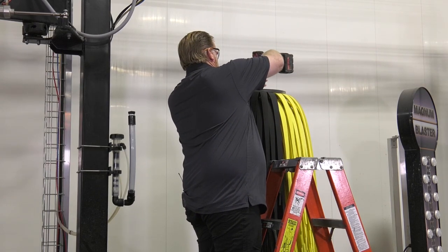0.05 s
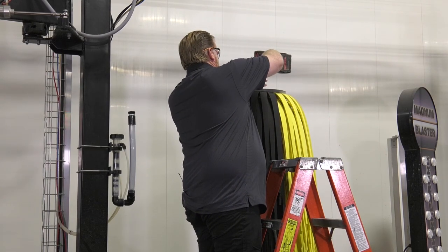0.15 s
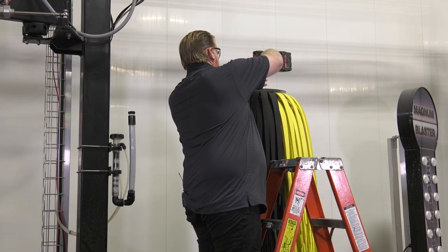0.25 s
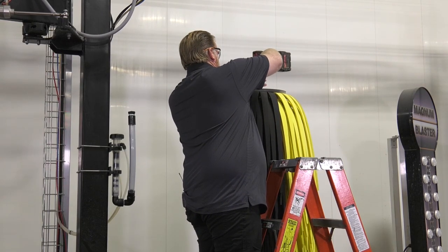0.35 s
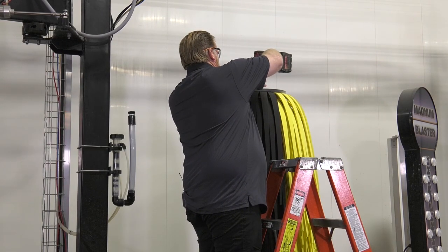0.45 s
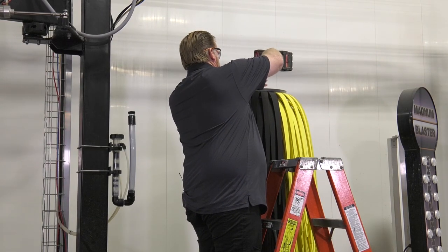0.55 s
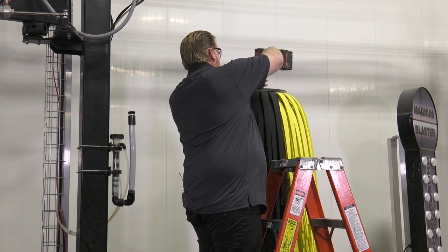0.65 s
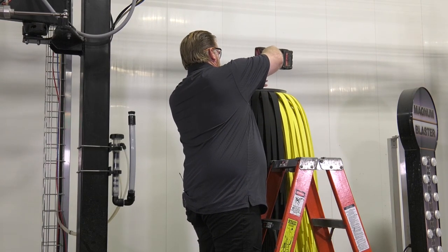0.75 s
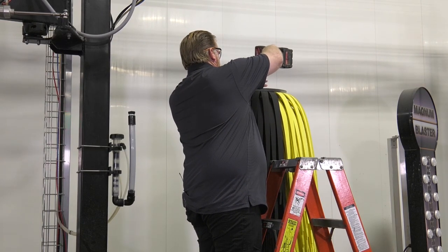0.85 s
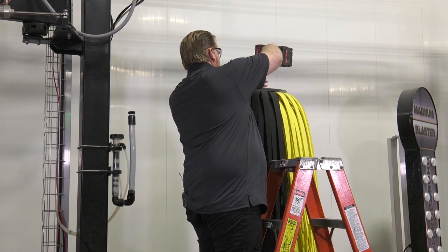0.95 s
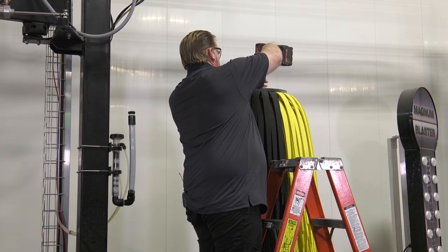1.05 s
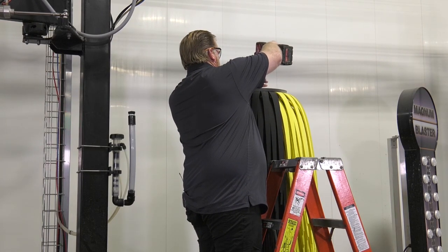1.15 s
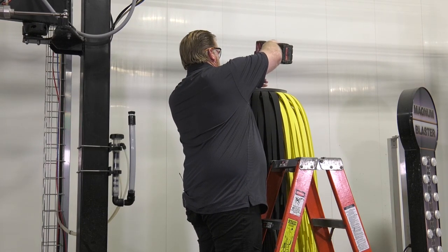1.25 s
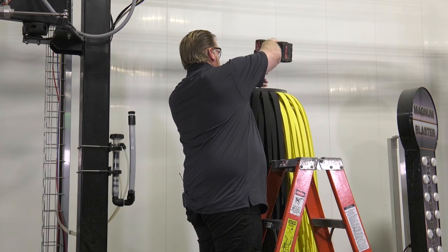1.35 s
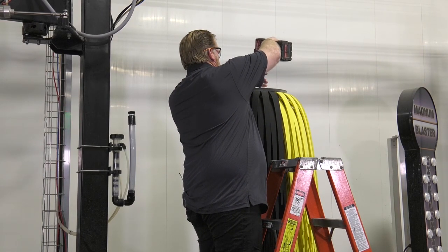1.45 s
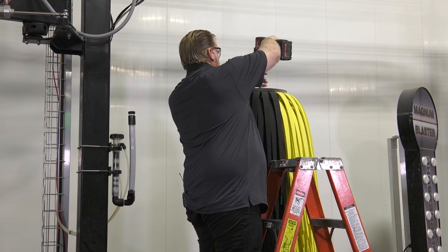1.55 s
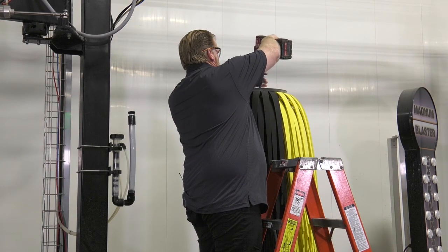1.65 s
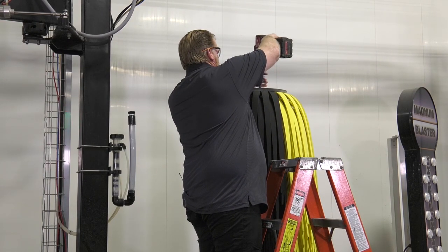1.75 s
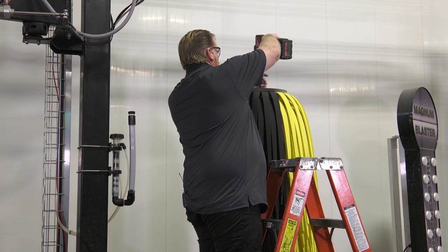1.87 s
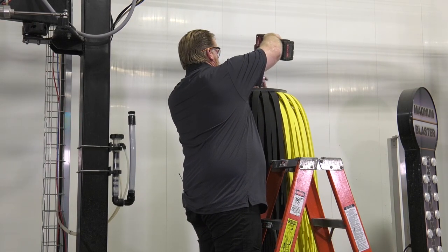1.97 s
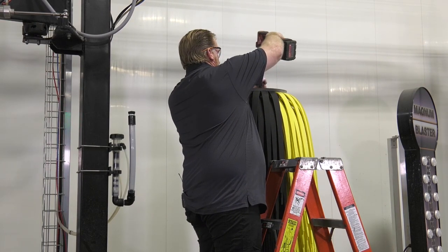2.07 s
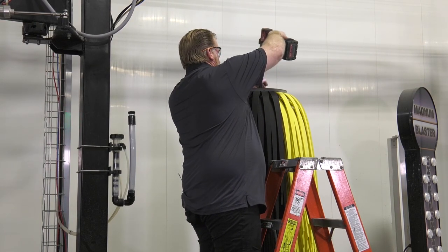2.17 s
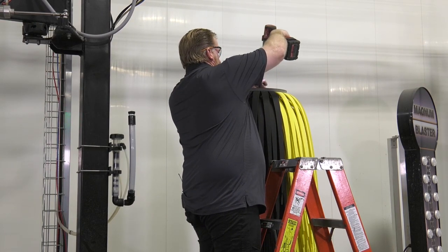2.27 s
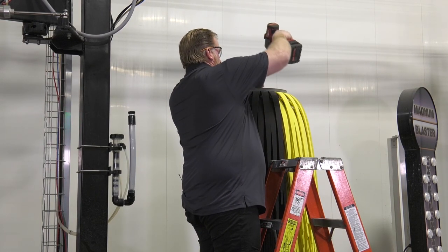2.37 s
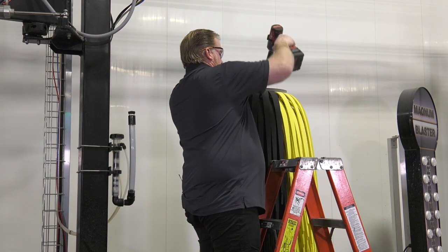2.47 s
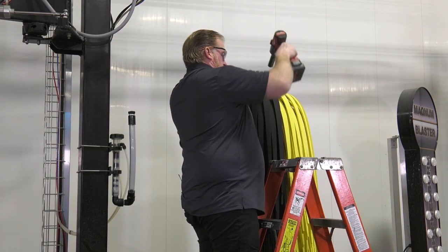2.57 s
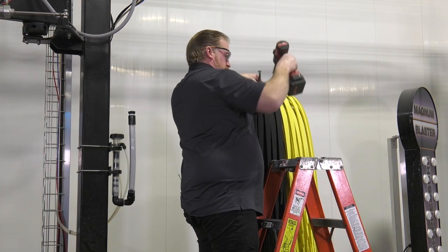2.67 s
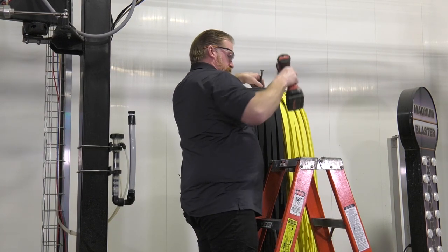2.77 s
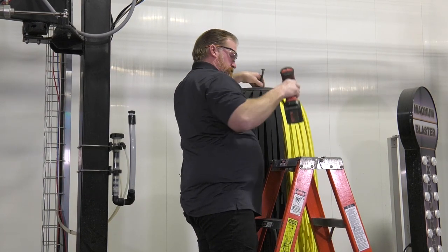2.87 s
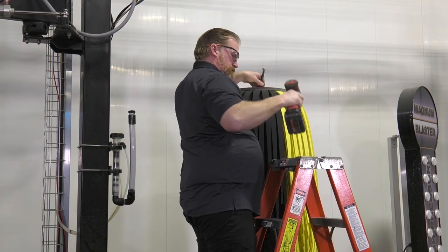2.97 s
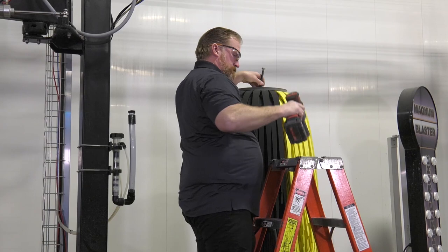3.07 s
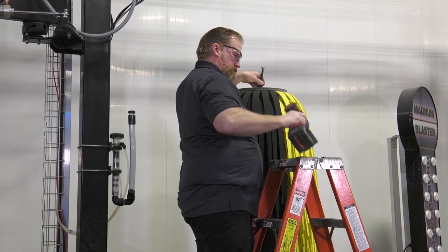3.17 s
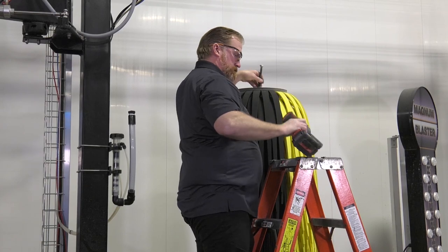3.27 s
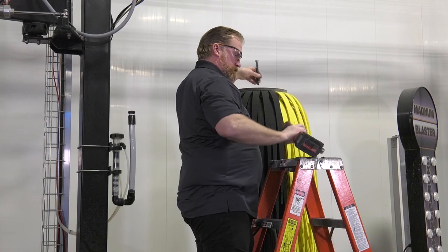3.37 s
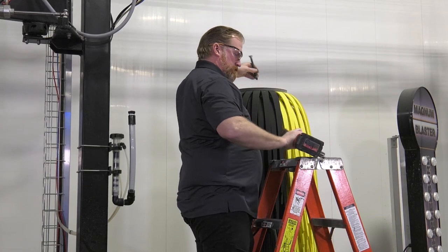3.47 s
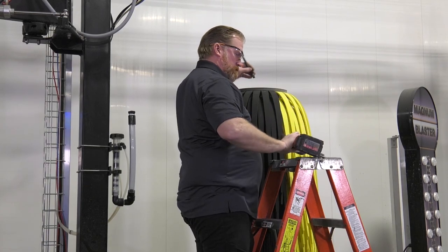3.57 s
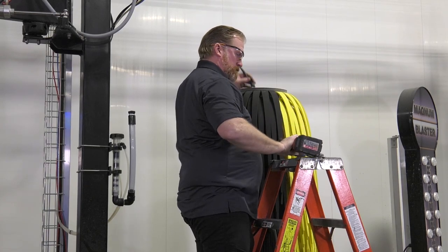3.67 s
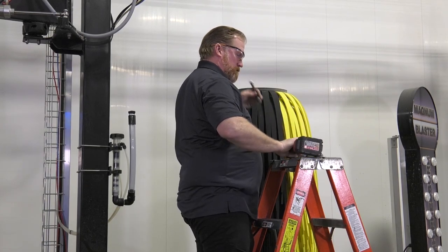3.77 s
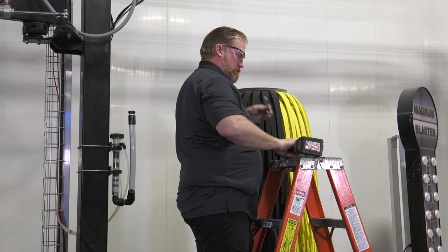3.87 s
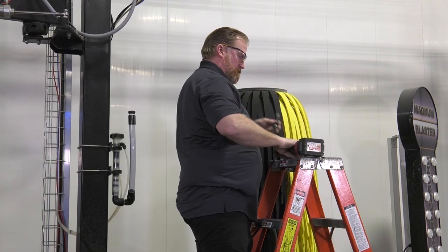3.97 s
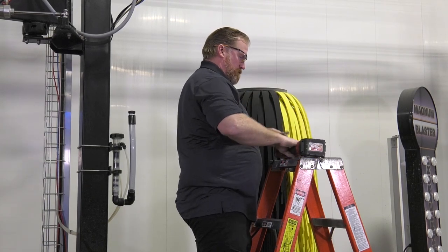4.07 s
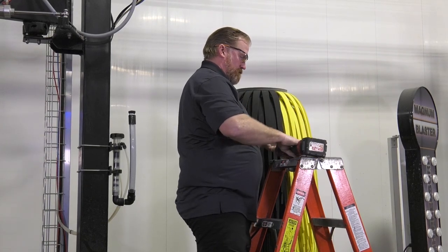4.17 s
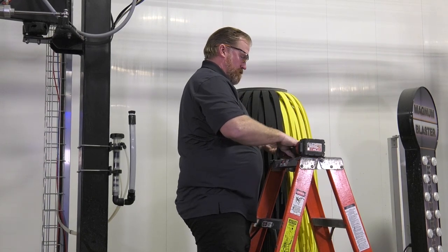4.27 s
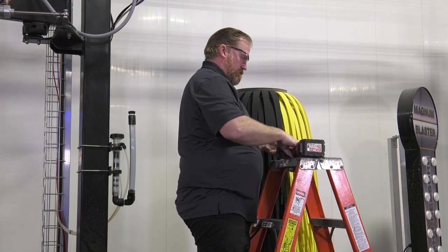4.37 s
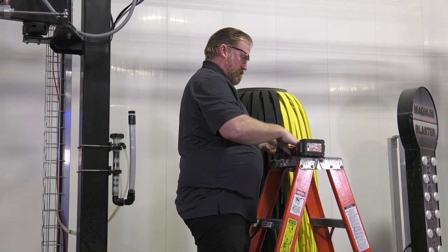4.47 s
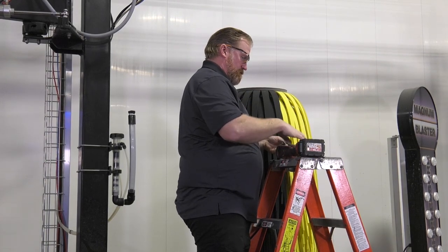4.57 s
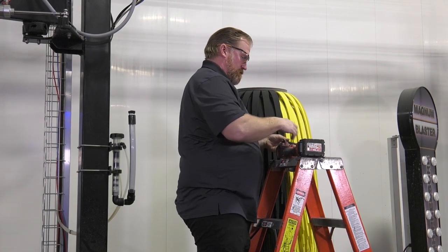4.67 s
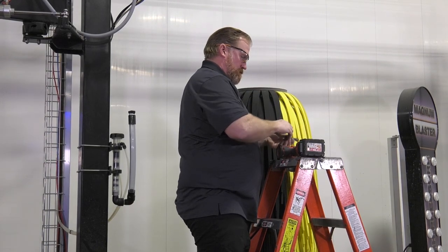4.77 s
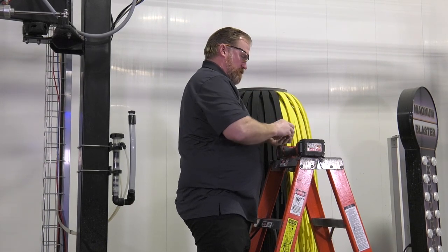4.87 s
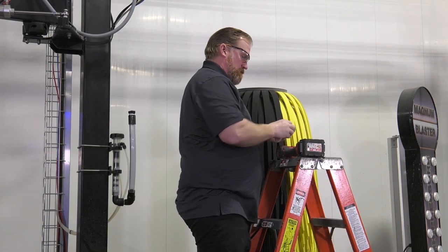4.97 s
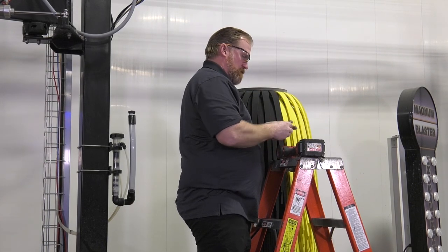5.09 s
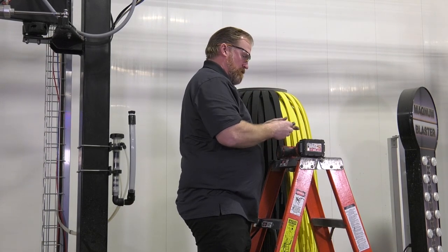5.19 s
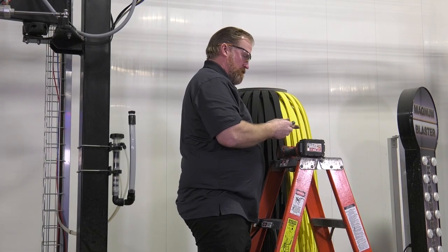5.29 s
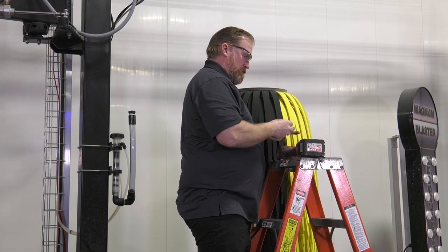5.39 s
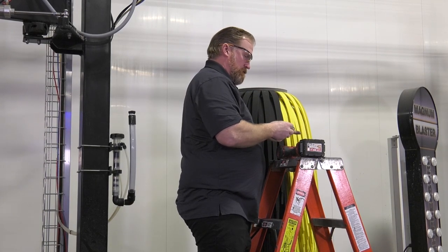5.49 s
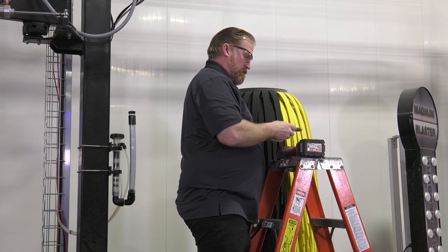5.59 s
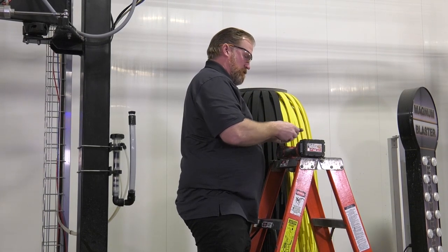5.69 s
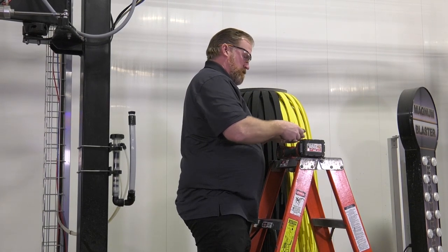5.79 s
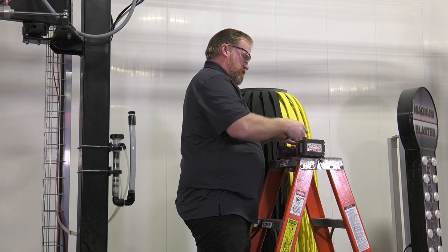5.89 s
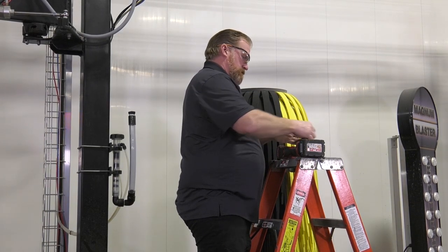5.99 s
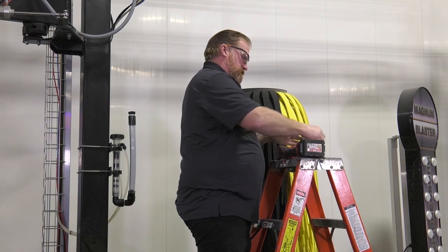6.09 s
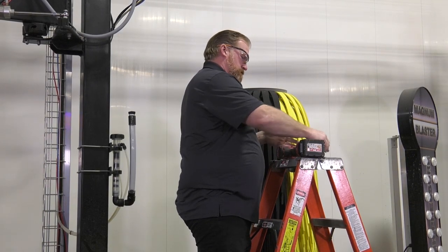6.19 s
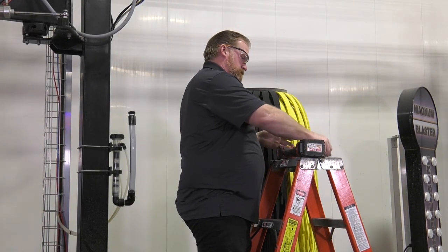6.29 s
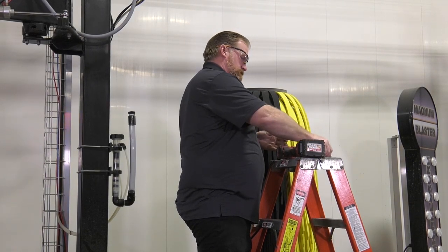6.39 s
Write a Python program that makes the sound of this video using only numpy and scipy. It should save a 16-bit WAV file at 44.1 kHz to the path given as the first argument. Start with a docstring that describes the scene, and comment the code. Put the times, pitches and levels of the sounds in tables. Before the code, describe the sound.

Steady fan noise fills a hard-surfaced room. A trigger snaps and an electric driver spins up with a short high chirp, socket chattering, gears buzzing, a stubborn screw thread croaking and squeaking in a fast pulse. The motor winds down amid sharp clicks. A quieter pause of light plastic and metal taps leads to a cluster of hollow ladder knocks, a small screw jingle and a final loud knock, heard fairly close with short echoes.

```python
"""In a hard-walled workroom with a ventilation hum, a cordless driver backs out a long screw.
Tooth meshing makes the motor whine, random impacts excite the gears and the socket, and stick-slip
makes the thread squawk in jerks until the brake stops the tool. Damped modes then sound the driver set down
on a stepladder, steel screws jingling in a hand and one last knock on the ladder."""
import sys
import numpy as np
from scipy import signal
from scipy.fft import rfft, irfft
from scipy.io import wavfile
from scipy.ndimage import uniform_filter1d

SR = 44100
rng = np.random.default_rng(int(sys.argv[2]) if len(sys.argv) > 2 else 0)


def unload_wav(signal):
    """Save mono or channel-first audio to the path in sys.argv[1] as 16-bit WAV at rate SR, clipped to [-1, 1]."""
    wavfile.write(
        sys.argv[1],
        SR,
        np.round(np.clip(np.atleast_2d(signal).T, -1, 1) * 32767).astype(np.int16),
    )


N = 284004
TIME = np.arange(N) / SR


def amp(db):
    """Decibel definition: amplitude ratio of a level in dB."""
    return 10 ** (np.asarray(db) / 20)


def unit(x):
    """Normalization: scales a signal to an rms of 1."""
    return x / np.sqrt(np.mean(x ** 2) + 1e-20)


def loudest(x, size=220):
    """Short-time energy: the highest rms in a window of a few milliseconds."""
    return np.sqrt(uniform_filter1d(x ** 2, size).max() + 1e-20)


def read(points, hz):
    """Spectral interpolation: a curve's value at hz, on a log-frequency axis."""
    f, value = np.transpose(points)
    return np.interp(np.log(hz + 1), np.log(f + 1), value)


def level(s, db):
    """Envelope: gain along a dB curve, practically silent outside it."""
    return amp(np.interp(TIME, s, db, left=-150, right=-150))


def before(s, blur_s):
    """Smooth switching: falls from 1 to 0 around the time s."""
    return .5 - .5 * np.tanh((TIME - s) / blur_s)


def add(mix, s, sound):
    """Superposition: adds a sound to the mix from the time s on."""
    part = mix[max(round(s * SR), 0):][:len(sound)]
    part += sound[:len(part)]


def highpass(x, order, hz):
    """High-pass filtering: removes what lies below hz."""
    return signal.sosfilt(signal.butter(order, hz, "high", fs=SR, output="sos"), x)


def colour(x, points, size=4096):
    """Minimum-phase filtering: a causal filter of unit energy with the given spectrum."""
    db = np.maximum(read(points, abs(np.fft.fftfreq(size, 1 / SR))), -100)
    log_gain = np.log(amp(db))
    # the Hilbert transform of the log gain supplies the phase
    spectrum = np.exp(np.conj(signal.hilbert(log_gain)))
    taps = np.fft.ifft(spectrum).real[:size // 2]
    return signal.oaconvolve(x, taps / np.linalg.norm(taps))[:len(x)]


def ring(x, modes, size=8192):
    """Modal resonance: excites damped modes whose joint response has unit energy."""
    t = np.arange(size) / SR
    taps = np.zeros(size)
    for k, (hz, width, db) in enumerate(modes):
        decay = np.sqrt(width) * np.exp(-np.pi * width * t)
        taps += (-1) ** k * amp(db) * decay * np.sin(2 * np.pi * hz * t)
    return signal.oaconvolve(x, taps / np.linalg.norm(taps))[:len(x)]


def drift(rate_hz):
    """Random modulation: lowpassed noise of rms 1."""
    smoothing = np.exp(-(np.fft.rfftfreq(N, 1 / SR) / rate_hz) ** 2)
    return unit(irfft(rfft(rng.standard_normal(N)) * smoothing, N))


def grains(per_s, spread_db, size=N):
    """Random impulse train: tiny impacts of uneven size and random sign, rms 1."""
    at = np.flatnonzero(rng.random(size) < per_s / SR)
    size_db = spread_db * np.minimum(rng.exponential(1, size)[at], 4)
    out = np.zeros(size)
    out[at] = amp(size_db) * np.sign(rng.random(size)[at] - .5)
    return unit(out)


def blow(bass_db, treble_db, body, size=440):
    """Contact hardness: weights a struck body's low and high range against its middle."""
    bands = [(60, 1200), (1200, 5000), (5000, 17000)]  # Hz
    parts = [signal.sosfilt(signal.butter(3, band, "band", fs=SR, output="sos"), body) for band in bands]
    low, middle, high = [part / loudest(part, size) for part in parts]
    return amp(bass_db) * low + middle + amp(treble_db) * high


# spectrum of the moving air: (frequency [Hz], relative level [dB])
AIR_SPECTRUM = [(12, -60), (20, -35), (49, -13.5), (101, -3), (163, -3.5), (193, -11.5), (228, -5),
                (255, -17.5), (310, -7.5), (446, -11.5), (660, -15.5), (976, -17), (1120, -21.5),
                (2080, -20.5), (16000, -39.5)]
# fan tones: (frequency [Hz], relative level [dB])
FAN_TONES = [(161.5, -61), (220.7, -66.5), (457.6, -66), (963.6, -63), (2013, -79), (8134, -101)]
AIR_DB = -50.5


def ventilation():
    """Broadband flow noise and tonal fan noise: steady moving air with a few wavering tones."""
    hum = sum(amp(db) * np.sin(2 * np.pi * hz * TIME + 0.55 * drift(5.5)) for hz, db in FAN_TONES)
    air = colour(rng.standard_normal(N), AIR_SPECTRUM) * amp(0.28 * drift(11))
    return amp(AIR_DB) * air + amp(1.0) * hum


# reverberation of the room: (frequency [Hz], t60 [s])
REVERBERATION = [(150, .6), (600, .62), (2000, .52), (5000, .36), (10000, .22), (16000, .15)]


def room(x):
    """Reverberant decay: sparse reflections of random sign make a tail whose high treble dies first."""
    reflections = rng.choice([-1., 1.], SR) * (rng.random(SR) < 3000 / SR)
    hz, t, z = signal.stft(reflections, SR, nperseg=256)
    decay = amp(-60 * t / read(REVERBERATION, hz)[:, None])
    onset = np.minimum(t / 0.0029, 1)
    tail = signal.istft(z * decay * onset, SR, nperseg=256)[1]
    return signal.fftconvolve(x, tail / np.linalg.norm(tail))[:N]


# knocks on the ladder top: (time [s], relative peak [dB], bass against middle [dB],
# treble against middle [dB], t60 of the clatter [s], contact ring [Hz], lowest frequency shaken [Hz])
LADDER_KNOCKS = [(3.639, -13, -2, -7.5, 0.11, 1630, 330), (3.733, -40, -1, 11, 0.081, 1560, 400),
                 (3.897, -12.5, -7, -8, 0.097, 2470, 330), (3.937, -14.5, -4, -1, .072, 1540, 327),
                 (4.001, -19, -10, -7, 0.058, 1810, 348), (4.050, -29, -5, -8, 0.055, 2440, 400),
                 (4.205, -8.5, -5, -4.5, 0.13, 1760, 550), (4.28, -13.5, -3.5, -4.5, 0.16, 1880, 348),
                 (4.346, -30, -10, -4, .09, 3500, 450), (4.367, -17, -9, -8.5, 0.059, 1350, 456),
                 (6.412, 2.5, -3, -10, 0.064, 2840, 676)]
# spectrum of the struck ladder: (frequency [Hz], relative level [dB])
LADDER_SPECTRUM = [(88, -50), (150, -27), (244, 0), (484, 5.5), (612, -0.5), (730, 5), (1040, 7),
                   (1190, -2), (1720, 2), (2270, 4), (3620, -1), (10000, -27), (10800, -23.5), (15100, -25),
                   (16000, -66)]
# modes of the ladder: (frequency [Hz], width [Hz], relative level [dB])
LADDER_MODES = [(517, 20, -2), (765, 30, -3), (877, 25, 2), (1035, 30, -1), (1330, 50, -10), (1730, 80, -3),
                (1930, 60, -6), (2480, 60, -5), (2680, 70, -7), (3570, 90, -7), (3900, 140, -10)]
# reflections from nearby walls: (delay [s], gain [ratio])
WALL_ECHOES = [(.0085, 0.06), (0.0113, 0.39), (.0205, .25), (.032, 0.051)]
CRACK_DB, CRACK_GROWTH = 1.5, 0.54  # first crack of a 0 dB blow, and its dB per dB of strength


def ladder():
    """Modal impact: the battery and parts land on the hollow ladder top; the walls answer at once."""
    out, t = np.zeros(N), np.arange(SR // 3) / SR
    for s, db, bass_db, treble_db, t60, hz, lowest_hz in LADDER_KNOCKS:
        clatter = grains(5000, 3.7, size=len(t)) * amp(-60 * t / t60)
        first = amp(CRACK_DB + CRACK_GROWTH * db) * rng.standard_normal(len(t)) * amp(-60 * t / 0.029)
        crack = first + amp(4) * clatter
        notes = ring(crack * amp(-60 * t / 0.021), LADDER_MODES)
        contact = ring(crack, [(hz, hz / 10, 0)])
        body = unit(colour(crack, LADDER_SPECTRUM)) + amp(-6.0) * unit(notes) + amp(-4.5) * unit(contact)
        heard = body.copy()
        for delay, gain in WALL_ECHOES:
            add(heard, delay, gain * body)
        sound = blow(bass_db, treble_db, heard)
        boom = np.sin(2 * np.pi * LADDER_MODES[0][0] * t) * amp(-60 * t / 0.31)
        # a blow near the rim hardly moves the lowest modes
        sound = highpass(sound / loudest(sound) + amp(-15.5) * boom, 4, lowest_hz)
        thud = np.sin(2 * np.pi * 62 * t) * amp(-60 * t / 0.043)
        thud += np.sin(2 * np.pi * 160 * t) * amp(-60 * t / 0.047)
        add(out, s, amp(db) * (sound + amp(-26.0) * thud))
    return amp(-11.0) * out


def chatter(rows, modes, tilt_db, per_s, tick_db, tick_hz, uneven_db, detune):
    """Multiple-impact excitation: steel parts bounce and slide; every contact favours other modes."""
    out, t = np.zeros(N), np.arange(SR // 6) / SR
    for s, db, length in rows:
        chance, *sizes = rng.standard_normal((len(modes) + 2, len(t)))
        # contacts weaken by 17 dB within the length
        contacts = (rng.random(len(t)) < per_s / SR) * amp(2.8 * chance - 17.0 * (t / length) ** 2)
        contacts[0] = 1.04
        favour_db = uneven_db * rng.standard_normal(len(modes))
        sound, seating = np.zeros(len(t)), 1 + detune * rng.standard_normal()
        for (hz, width, mode_db), size, favour in zip(modes, sizes, favour_db):
            gain = amp(mode_db + favour + tilt_db * np.log2(hz / 4000))  # tilt in dB per octave
            sound += gain * unit(ring(contacts * size, [(hz * seating, width, 0)], size=4096))
        tick = highpass(contacts * sizes[-1], 1, tick_hz)
        sound = unit(sound) + amp(tick_db) * unit(tick)
        add(out, s, amp(db) * sound / loudest(sound))
    return out


# screws slide over each other in the hand: (start [s], end [s], relative level [dB], fade [dB/s])
SCREW_SLIDES = [(5.645, 5.696, -43.5, -100), (5.716, 5.885, -37, 0), (5.891, 5.953, -42, 66)]
# modes of a steel screw: (frequency [Hz], width [Hz], relative level [dB])
SCREW_MODES = [(1750, 20, -19), (4830, 35, -16), (9290, 28, 1), (10600, 30, -12), (10850, 30, -4),
               (12900, 60, -20), (14200, 45, -19), (14850, 35, -12)]


def slide(per_s=1600, spread_db=6.0, uneven_db=8.0, ticks_per_s=260, tick_db=-13):
    """Frictional excitation: dense thread contacts ring the screws, mode by mode; the ridges tick."""
    push = np.zeros(N)
    for start, end, db, fade in SCREW_SLIDES:
        sliding = (TIME > start) * (TIME < end)
        push += sliding * amp(db - fade * np.clip(TIME - start, 0, end - start))
    ticks = push * grains(ticks_per_s, 5.3)
    rub = 0.87 * (push * grains(per_s, spread_db) + ticks)
    rings = sum(amp(mode[2] - 0.5) * ring(rub * amp(uneven_db * drift(11)), [mode]) for mode in SCREW_MODES)
    return rings + amp(tick_db) * highpass(ticks, 1, 4000)


# screws clink together: (time [s], peak level [dB], length [s])
SCREW_CLINKS = [(2.06, -33.5, 0.041), (5.128, -59, .004), (5.221, -35, 0.0017), (5.481, -51, 0.0011),
                (5.598, -54, .004), (5.722, -18, 0.009), (5.955, -35, 0.0032), (5.970, -29, 0.0021),
                (6.011, -50, .003)]


def screws():
    """Impact and friction: the screws clink together and slide over each other."""
    clinks = chatter(SCREW_CLINKS, SCREW_MODES, tilt_db=0.5, per_s=2300, tick_db=-14, tick_hz=6000,
                     uneven_db=7.0, detune=0)
    return clinks + slide()


# bumps of the plastic casing: (time [s], relative level [dB], frequency [Hz], t60 of the note [s])
CASING_BUMPS = [(2.493, -49.5, 1290, 0.053), (2.560, -39.5, 1280, 0.052), (2.992, -51, 1300, .03),
                (3.144, -43, 586, 0.072), (6.2146, -39, 2300, 0.015), (6.298, -48.5, 2070, .02)]


def tocks():
    """Cavity resonance: the hollow casing answers a light bump with one short note and a soft thud."""
    out, t = np.zeros(N), np.arange(SR // 8) / SR
    for s, db, hz, t60 in CASING_BUMPS:
        note = np.sin(2 * np.pi * hz * t) * amp(-60 * t / t60)
        scuff = unit(ring(rng.standard_normal(len(t)), [(hz, hz / 2, 0)])) * amp(-60 * t / 0.053)
        thud = np.sin(2 * np.pi * 105 * t) * amp(-60 * t / 0.085)
        add(out, s, amp(db) * (amp(9.5) * note + amp(-4.0) * scuff + amp(-7) * thud))
    return out


# clicks of trigger, gears, brake and fingers: (time [s], relative peak [dB], bass against middle [dB],
# treble against middle [dB], t60 of the first decay [s])
SHARP_CLICKS = [(.109, -29, -9, 4, .022), (.142, -5, -3.5, 1.5, 0.0079), (0.222, -9, 0, -8, 0.029),
                (1.701, -18, -2.5, -7, 0.034), (1.75, -9, -1.5, 5.5, 0.11), (1.815, -12.5, -18, 4, 0.042),
                (1.947, -10, -6, 10, .029), (2.086, -3.5, -19, -2, 0.018), (2.823, -37, 9, 8, 0.018),
                (2.857, -43, 3, 13, 0.022), (2.99, -36, 7, -5, .025), (3.106, -27, -10, 0, 0.028),
                (5.709, -26, -4, 5, 0.027), (6.212, -35, 5, -20, 0.027), (6.296, -38, -6, -20, 0.027)]
# spectrum of a click: (frequency [Hz], relative level [dB])
CLICK_SPECTRUM = [(100, 8.5), (400, 3.5), (700, 6), (2200, -4), (4000, 1.5), (7000, -7.5), (10000, -5),
                  (16000, -12)]


def clicks():
    """Impulsive contact: dry snaps of hard plastic and steel, each a fast decay with a weak slower tail."""
    out, t = np.zeros(N), np.arange(SR // 8) / SR
    for s, db, bass_db, treble_db, t60 in SHARP_CLICKS:
        decay = amp(-60 * t / t60) + amp(-19.0) * amp(-60 * t / 0.11)
        snap = rng.standard_normal(len(t)) * decay
        sound = blow(bass_db, treble_db, colour(snap, CLICK_SPECTRUM))
        add(out, s, amp(db) * sound / loudest(sound))
    return amp(-9.5) * out


# bursts of rattling on the tight screw head: (start [s], end [s], peak level [dB])
RATTLE_BURSTS = [(0.267, 0.323, -19), (.377, 0.563, -17.5)]
RATTLES_PER_S = 32.3
RATTLE_S, RATTLE_ENDS_DB = 0.015, -2  # length of one rattle; a burst is weaker at both ends


def rattles():
    """Periodic impact: rows (time [s], peak [dB], length [s]) that swell towards the middle of a burst."""
    rows = []
    for start, end, db in RATTLE_BURSTS:
        for s in np.arange(start, end, 1 / RATTLES_PER_S):
            place = 2 * (s - start) / (end - start) - 1
            rows.append((s, db + RATTLE_ENDS_DB * place ** 2, RATTLE_S))
    return rows


# single clanks of the socket: (time [s], peak level [dB], length [s])
SOCKET_CLANKS = [(.173, -21.5, 0.018), (1.755, -23.5, .012), (1.955, -22, 0.037), (2.146, -20.5, 0.0088),
                 (2.158, -24.5, 0.015), (2.189, -23, .003), (2.232, -27.5, 0.039), (2.405, -38, 0.0043),
                 (2.493, -41, 0.0028), (2.555, -39, 0.0071), (2.815, -49.5, 0.019), (3.108, -42, 0.0014),
                 (3.144, -38, 0.005), (3.304, -38.5, 0.03), (3.336, -44, 0.011)]
# modes of the socket, slightly detuned by its seating: (frequency [Hz], width [Hz], relative level [dB])
SOCKET_MODES = [(619, 85, 2), (1274, 76, -2), (2346, 65, 5.5), (3700, 37, 0.5), (4860, 26, -18),
                (5350, 55, -7), (7170, 120, -23), (9240, 290, -11.5), (11970, 170, -16), (13300, 110, -59),
                (14500, 200, -18)]


def socket():
    """Modal impact: the steel socket rattles in bursts on the screw head, with clanks before and after."""
    bursts = chatter(rattles(), SOCKET_MODES, tilt_db=5.0, per_s=2200, tick_db=-28, tick_hz=1510,
                     uneven_db=2.0, detune=0.028)
    clanks = chatter(SOCKET_CLANKS, SOCKET_MODES, tilt_db=1.0, per_s=2600, tick_db=-30, tick_hz=1510,
                     uneven_db=4.5, detune=0.0077)
    return highpass(bursts + clanks, 2, 220)  # the socket's rattle has little below 220 Hz


# single catches of the tight thread: (time [s], relative peak [dB], nominal pitch [Hz])
THREAD_CATCHES = [(.3372, -13, 475.6), (.415, -14.5, 524), (.5411, -18.8, 576), (.578, -11, 545),
                  (.6187, -11.5, 462.6)]
# friction in the thread: (time [s], relative squawk level [dB], nominal pitch [Hz])
THREAD_FRICTION = [(0.66, -19.5, 416), (0.862, -10.5, 638), (0.926, -9.5, 604), (0.938, -11, 678),
                   (1.074, -18, 577), (1.26, -15.5, 682.6), (1.4, -22.5, 606.7), (1.64, -16, 541),
                   (1.66, -27, 492)]
# after the catches the thread slips once per turn of the screw
FIRST_SLIP_S, LAST_SLIP_S, TURNS_PER_S = .668, 1.64, 36.4
SLIP_JITTER_S, SLIP_SPREAD_DB, SLIP_PITCH_SPREAD = 0.000987, 3, 0.0392
# slips are drawn out and peak lower at first, then short
DRAG_S, SNAP_S, DRAG_ENDS_S, DRAG_DB = 0.017, 0.0092, 0.85, -4
# numbers of the turns on which the thread hardly grips, and how much weaker they are
SMOOTH_TURNS, SMOOTH_DB = (9, 16), -13


def slips(catch_s=.014, peak_db=8.5):
    """Stick-slip cycle: rows (time [s], relative peak [dB], nominal pitch [Hz], nominal length [s])."""
    s = np.arange(FIRST_SLIP_S, LAST_SLIP_S, 1 / TURNS_PER_S)
    late, louder, higher = rng.standard_normal((len(s), 3)).T
    at, friction_db, pitch_hz = np.transpose(THREAD_FRICTION)
    smooth, dragging = np.isin(np.arange(len(s)), SMOOTH_TURNS), s < DRAG_ENDS_S
    db = np.interp(s, at, friction_db) + peak_db + SLIP_SPREAD_DB * louder
    db = db + SMOOTH_DB * smooth + DRAG_DB * dragging
    hz = np.interp(s, at, pitch_hz) * (1 + SLIP_PITCH_SPREAD * higher)
    length = np.where(dragging, DRAG_S, SNAP_S)
    catches = [(*row, catch_s) for row in THREAD_CATCHES]
    return catches + list(zip(s + SLIP_JITTER_S * late, db, hz, length))


# spectra of the rubbing noise and of its grit: (frequency [Hz], relative level [dB])
RASP_SPECTRUM = [(300, -50), (900, 3), (1400, 4.5), (2000, 6), (2800, 2), (5000, -40), (9000, -14.5)]
GRIT_SPECTRUM = [(1500, -18), (4000, -16), (5500, -3), (6700, -4), (7600, 7.5), (8700, -2), (10500, -2),
                 (12500, -24), (14000, -18), (15000, -7), (16000, 2)]
# modes of the driver housing: (frequency [Hz], width [Hz], relative level [dB])
HOUSING_MODES = [(391.5, 19.6, -1), (484, 65, -6.5), (640, 62, -3), (781.4, 9.9, -4.5), (1980, 60, -13)]


def thread():
    """Stick-slip: each slip scrapes, then swells into a short squawk whose pitch climbs and eases."""
    tone, rasp, grit = np.zeros((3, N))
    t = np.arange(-SR // 40, SR // 40) / SR
    for s, db, hz, length in slips():
        pitch = hz * (.68 + 0.3747 * np.exp(-((t - .003) / 0.01096) ** 2))
        phase = 2 * np.pi * (np.cumsum(pitch) / SR + rng.random())
        fade = signal.windows.tukey(len(t), .5)
        swell = amp(db) / (1 + (t / (0.41 * length)) ** 2) ** 1.13 * fade
        overtones = amp(-20) * np.sin(2 * phase) + amp(-15) * np.sin(3 * phase) + amp(-22) * np.sin(4 * phase)
        add(tone, s + t[0], swell * (np.sin(phase) + overtones))
        # rubbing noise grows less with strength than the squawk and lasts longer
        rub = amp(.65 * db) / (1 + (t / (.65 * length)) ** 2) * fade
        add(rasp, s + t[0] + 0.00092, rub * (1 + 0.92 * np.sin(phase)))
        add(grit, s + t[0] - .004, rub * np.exp(-(t / 0.013) ** 2))
    rasp, grit = rasp * grains(9000, 1.1), grit * grains(5000, 5.6)
    scrape = amp(-20.0) * colour(rasp, RASP_SPECTRUM) + amp(-20.0) * colour(grit, GRIT_SPECTRUM)
    scrape += amp(-33) * ring(grit, GEARBOX_MODES)
    return amp(-0.47) * tone + amp(-18.5) * ring(rasp, HOUSING_MODES) + scrape


# trigger pulled, spin-up time constant, trigger let go, braking time
TRIGGER_S, SPIN_UP_S, RELEASE_S, BRAKE_S = .135, .035, 1.84, .31
SAG, EASE_S = .05, 0.46  # share of speed that the tight screw takes; time constant of the easing load


def load():
    """Exponential relaxation: how tight the screw is, 1 at the start, easing towards 0."""
    return np.exp(-np.maximum(TIME - TRIGGER_S, 0) / EASE_S)


def speed():
    """Rotor dynamics: share of the free speed with a quick spin-up, a sag under load, then the brake."""
    spin_up = 1 - np.exp(-np.maximum(TIME - TRIGGER_S, 0) / SPIN_UP_S)
    braking = np.maximum(1 - (np.maximum(TIME - RELEASE_S, 0) / BRAKE_S) ** 2, 0)
    return spin_up * (1 - SAG * load()) * braking


# gearbox clatter: (time [s], relative level of the middle [dB], relative level of the treble [dB])
GEAR_LEVELS = [(0.16, -30, -46), (0.176, -28, -29.5), (0.298, -22, -23), (0.544, -26, -24),
               (0.63, -26, -28), (0.882, -21, -25), (1.208, -23, -27), (1.266, -18.5, -22),
               (1.368, -22, -27.5), (1.512, -24, -26), (2.004, -25, -30.5), (2.08, -40, -42)]
GEAR_RISE_DB_PER_S, GEAR_STOP_DB_PER_S = 330, 400  # the treble rises and stops twice as steeply
WHIR_DB, WHIR_FADE_DB_PER_S, WHIR_TREBLE_DB = -46, 29, -5  # faint whir left after the clatter stops


def gear_gains():
    """Envelopes of clatter and treble: a fast rise, the run, a fast stop and a fading whir."""
    s, body_db, treble_db = np.transpose(GEAR_LEVELS)
    early, late = np.maximum(s[0] - TIME, 0), np.maximum(TIME - s[-1], 0)
    ends = amp(-GEAR_RISE_DB_PER_S * early - GEAR_STOP_DB_PER_S * late) * (TIME > START_CHIRP[0][0])
    whir = amp(WHIR_DB - WHIR_FADE_DB_PER_S * late) * (late > 0)
    clatter = ends * amp(np.interp(TIME, s, body_db)) + whir
    treble = ends ** 2 * amp(np.interp(TIME, s, treble_db)) + amp(WHIR_TREBLE_DB) * whir
    return clatter, treble


# spectra of clatter, its treble and the tool's wobble: (frequency [Hz], relative level [dB])
CLATTER_SPECTRUM = [(90, -41), (150, -19), (250, -17.5), (390, 1.5), (460, -8.5), (570, 1.5), (930, -3.5),
                    (1500, -6), (1750, -1.5), (2900, -9), (3800, -3), (4300, -7.5), (5600, -6),
                    (7000, -13.5), (9100, -52)]
FIZZ_SPECTRUM = [(3500, -22), (6000, 2), (6800, -5), (7600, -2), (8700, -7), (10000, -6), (11300, -8.5),
                 (12400, -5), (13800, -6), (15300, -18), (16000, -27)]
WOBBLE_SPECTRUM = [(25, -26), (70, -10), (140, -1.5), (240, -3.5), (380, -0.5), (520, -6), (900, -49),
                   (2000, -45)]
# ringing steel parts of the gearbox: (frequency [Hz], width [Hz], relative level [dB])
GEARBOX_MODES = [(5420, 70, -3.5), (7400, 110, -1), (9650, 72, -7.5), (9400, 430, -3.5), (10880, 620, 2.5),
                 (14000, 140, -16), (14840, 130, 0)]
# electronic drive chirp at start-up: (time [s], mean frequency [Hz], level [dB])
START_CHIRP = [(.1, 9750, -58), (.115, 9850, -35), (.135, 10150, -32), (.155, 10700, -30.5),
               (.19, 10930, -46)]
FREE_HZ = 3385  # mean gear whine with no load
# the whine of the free gears, its gain under full load, and its mean gain under the brake
WHINE_DB, WHINE_LOAD_DB, WHINE_BRAKE_DB = -40.5, 18, 7.5
WHINE_RISES_S = 0.23  # the teeth begin to sing only near full speed
# the screw rubs once per turn: depth of that pulsing in the clatter and in its treble
TURN_BODY_DB, TURN_TREBLE_DB = -0.5, 2.5
STRIKES_PER_S, STRIKE_SPREAD_DB = 700, 3.8
STEEL_FREE_S, STEEL_GROWTH = 1, 1.48  # steel rings more once the screw stands clear; dB per dB of treble
# the screw breaks loose at LOOSE_S; the tool wobbles hard before that and little afterwards
LOOSE_S, WOBBLE_TIGHT_DB, WOBBLE_LOOSE_DB = 0.574, -27.5, -48.5


def motor():
    """Gear meshing: teeth whine and clatter, throbbing once per rotor turn; the drive chirps at start."""
    pace = speed()
    mesh = 2 * np.pi * np.cumsum(FREE_HZ * pace * (1 + 0.00264 * drift(31))) / SR
    # under the brake the teeth chatter, so the whine breaks up
    braked = 1 - before(RELEASE_S + 0.056, 0.027)
    whine_db = WHINE_DB + WHINE_LOAD_DB * load() + braked * (WHINE_BRAKE_DB + 4 * drift(60))
    singing = (1 - 1.2 * before(WHINE_RISES_S, 0.023)) * pace ** 2.2 * (1 + 0.31 * drift(50))
    whine = amp(whine_db) * singing * (np.sin(mesh) + amp(-12) * np.sin(2 * mesh))

    rotor = mesh / 9
    throb = (1 + 0.047 * np.sin(rotor)) * amp(1.8 * drift(93))
    clatter, treble = gear_gains()
    turn = np.cos(2 * np.pi * TURNS_PER_S * (TIME - FIRST_SLIP_S))
    turn = turn * before(LAST_SLIP_S, 0.018) * (1 - before(DRAG_ENDS_S, 0.045))
    clatter, treble = clatter * amp(TURN_BODY_DB * turn), treble * amp(TURN_TREBLE_DB * turn)
    body = amp(-1.5) * clatter * colour(grains(12000, 3.83) * throb, CLATTER_SPECTRUM)
    fizz = amp(-5.0) * colour(treble * throb * grains(12000, 2.5), FIZZ_SPECTRUM)

    # each steel part is struck on its own, so the rings flare up in turn
    strikes = treble ** STEEL_GROWTH * throb * (1 - 0.72 * before(STEEL_FREE_S, 0.21))
    steel = np.zeros(N)
    for mode in GEARBOX_MODES:
        steel += amp(mode[2] + 3.0) * ring(strikes * grains(STRIKES_PER_S, STRIKE_SPREAD_DB), [mode])

    sway = pace * (amp(WOBBLE_TIGHT_DB) * before(LOOSE_S, 0.042) + amp(WOBBLE_LOOSE_DB))
    wobble = sway * colour(grains(500, 2.9), WOBBLE_SPECTRUM)

    s, hz, db = np.transpose(START_CHIRP)
    switching = 2 * np.pi * np.cumsum(np.interp(TIME, s, hz) * (1 + 0.0098 * drift(500))) / SR
    steady_tone = np.sin(2 * np.pi * 3210 * TIME + 0.86 * drift(150))
    chirp = level(s, db) * (np.sin(switching) + amp(-9.5) * steady_tone)
    return whine + body + fizz + steel + wobble + chirp


def scene():
    """Superposition: all sources and their reverberation, a little louder on the left."""
    # the driver's sound has little below 70 Hz
    driver = highpass(motor() + thread() + clicks() + tocks(), 2, 70)
    tool = driver + socket()
    jingle, knocks = screws(), ladder()
    wet = room(amp(-15.0) * tool + amp(-18) * jingle + amp(-11.5) * knocks)
    return (tool + jingle + knocks + wet + ventilation()) * amp([[1.3], [-1.6]])


EDGE_HZ = 15850  # upper band limit


def record(dry):
    """Saturation and band limiting: the loudest peaks are rounded off, then the top is cut."""
    rounded = dry / (1 + dry ** 6) ** (1 / 6)
    lowpass = signal.firwin(511, EDGE_HZ, window=("kaiser", 9), fs=SR)
    return signal.oaconvolve(rounded, lowpass[None], "same")


dry = scene()
out = record(dry)
unload_wav(out)
```